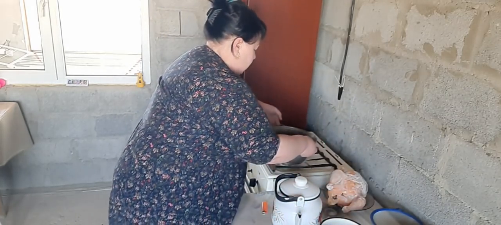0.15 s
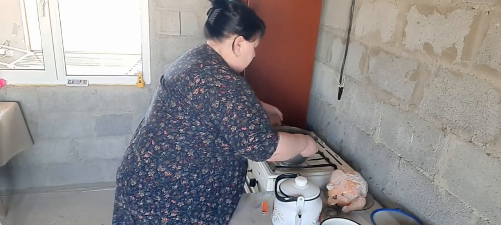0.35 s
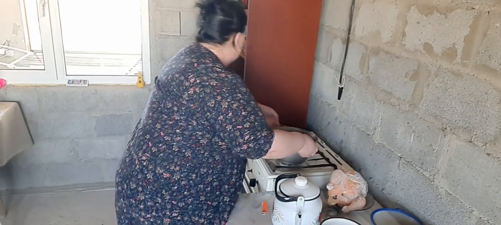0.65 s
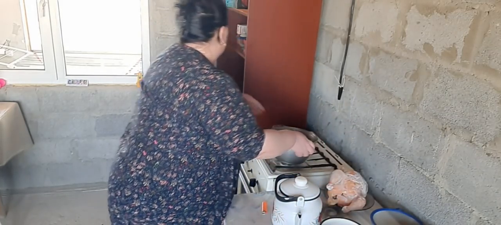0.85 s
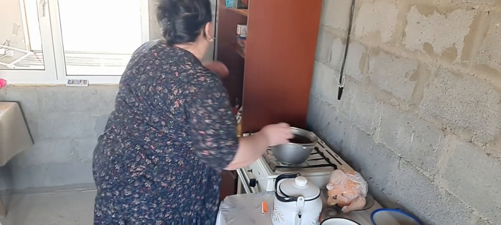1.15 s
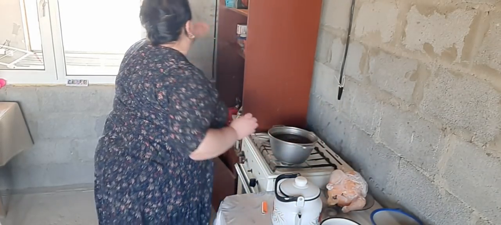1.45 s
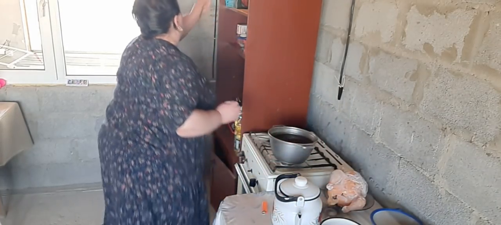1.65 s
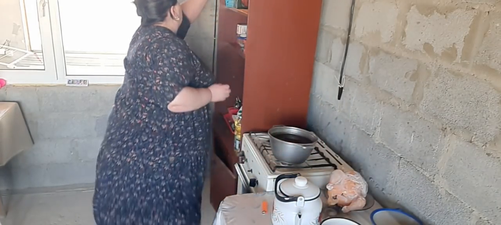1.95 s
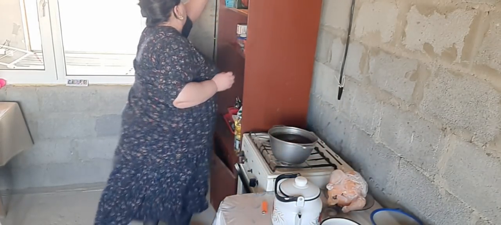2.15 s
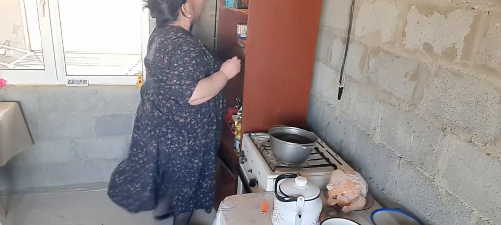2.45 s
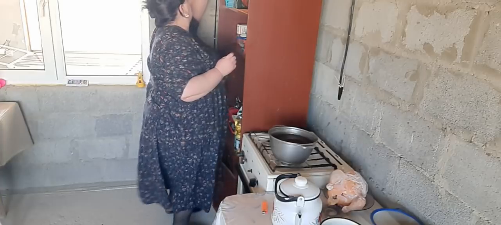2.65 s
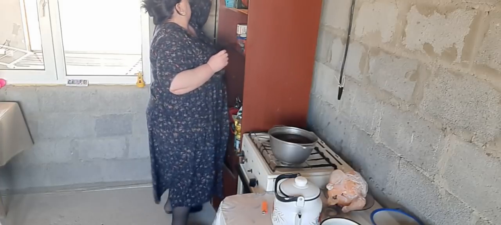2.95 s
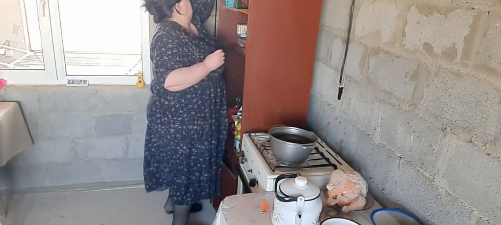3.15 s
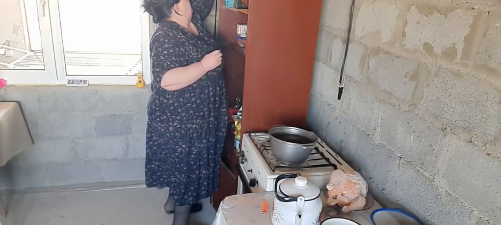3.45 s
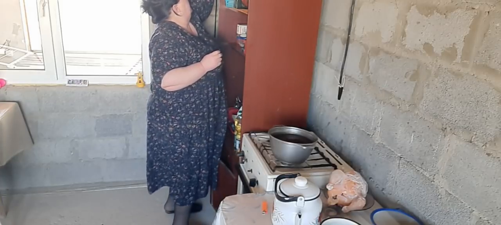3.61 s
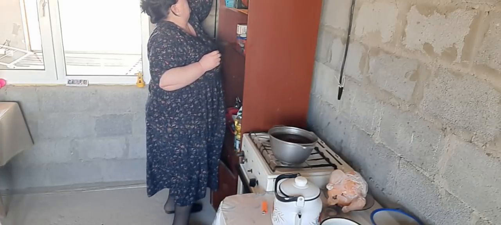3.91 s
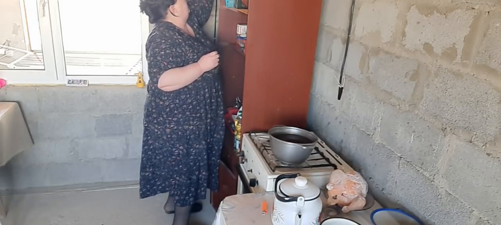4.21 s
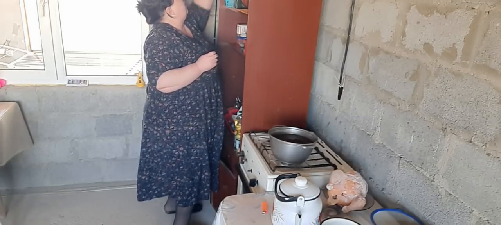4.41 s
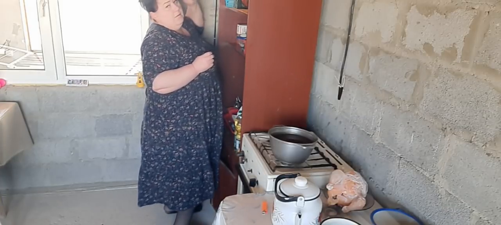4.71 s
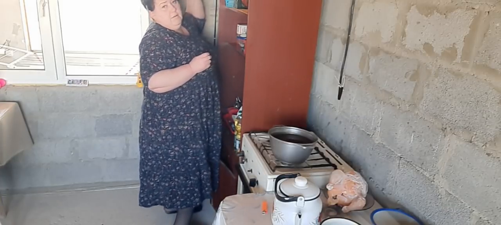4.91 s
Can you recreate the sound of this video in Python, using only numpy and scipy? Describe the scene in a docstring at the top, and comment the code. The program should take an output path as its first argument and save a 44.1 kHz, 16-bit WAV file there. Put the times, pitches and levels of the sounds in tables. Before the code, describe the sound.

In a bare kitchen, a pot rasps on a gas stove, soft steps follow, a dish knocks on a shelf and thin metal clatters down.

```python
"""A metal pot is shoved across a gas stove's grate: jerky slips rasp, ring the wall and make the sheet body drone.
Slippers thud and brush to a cupboard; a dish drags over a shelf, its rim singing, and knocks its neighbours.
A metal utensil clatters down and the wood is bumped: each blow is a noise crack, ringing modes and a room wash.
Under it all, the bare block-walled kitchen has faint air noise and a very thin, high electrical whine, a sine.
"""
import sys
import numpy as np
from scipy import signal
from scipy.fft import rfft, irfft, next_fast_len
from scipy.io import wavfile
from scipy.ndimage import uniform_filter1d

SR = 44100
rng = np.random.default_rng(int(sys.argv[2]) if len(sys.argv) > 2 else 0)


def generate_wav(sig):
    """Save sig (samples, or channels by samples) to the path in sys.argv[1] as 16-bit PCM at SR."""
    pcm = np.round(np.clip(np.atleast_2d(sig).T, -1, 1) * 32767).astype(np.int16)
    wavfile.write(sys.argv[1], SR, pcm)


N = 223603
TIME = np.arange(N) / SR
AGE = TIME[:SR * 3 // 4]   # time since a blow

# Shoves of the pot across the grate: [start t/s, hold/s, stove drone level/dB, rasp level/dB]
POT_SHOVES = [(0.098, 0.04, -32, -35), (0.194, 0.019, -38.5, -57), (0.268, .005, -36.5, -72),
              (0.321, 0.068, -40.5, -53), (0.462, 0.013, -41, -46.5), (0.551, 0.025, -47.5, -57.5)]
# Pot catching on the bars: [t/s, level/dB, brightness/dB per octave]
POT_CATCHES = [(0.109, -51.5, 0.5), (0.131, -44, 9.5), (0.143, -34, 14), (0.499, -41, 3),
               (0.510, -49.5, -8.5), (0.580, -46.5, -4)]
# Ringing of the pot wall: [f/Hz, level/dB, t60/s before the cap in ring()]
POT_WALL_MODES = [(2920, -9, .25), (3110, -12.5, 0.19), (4059, -2.5, 0.24), (4720, -4, 0.4),
                  (4780, 1, 0.24), (5200, -27, 0.27), (7500, 2, .18), (7200, 4.5, 0.091), (7400, -8, 0.24),
                  (8400, -6, 0.33), (10150, -16, .2), (12100, -11, 0.14)]
# Spectrum of rasp and catches: [f/Hz, level/dB per Hz]
POT_SPECTRUM = [(200, -24), (600, 4), (1000, 3.5), (1700, -3.5), (2600, 0), (3600, -7), (4700, -5.5),
                (6000, -11.5), (7300, -7), (9200, -22), (12500, -21.5), (15500, -35), (18000, -50)]
# Grate jolting in its seat: [t/s, level/dB, brightness/dB per octave]
GRATE_JOLTS = [(0.130, -37, 3), (0.293, -43.5, -3), (0.360, -45, -2.5), (0.395, -55, 1)]
# Ringing of the grate: [f/Hz, level/dB, t60/s before the cap in ring()]
GRATE_RINGING = [(596, 7, 0.41), (1325, 3, 0.45), (1420, 4, 0.52), (1520, -16, 0.18), (2320, -3.5, 0.32),
                 (2756, -4, 0.18)]
# Spectrum of the grate's cracks: [f/Hz, level/dB per Hz]
GRATE_SPECTRUM = [(150, -34), (600, -1), (1100, -34), (1500, 7), (1900, -1), (2400, 2.5), (4000, -12.5),
                  (9000, -37), (16000, -58)]
SHOVE_ATTACK_S, DRONE_T60_S = 0.048, 0.24
RASP_T60_S, RASP_SAG_DB_PER_S = 0.44, 155   # the rasp is strongest as the pot breaks loose


def pot():
    """Its base rasps over the bars, ringing the wall; it catches now and then and jolts the grate."""
    start_s, hold_s, drone_db, rasp_db = np.transpose(POT_SHOVES)
    drone_level = strokes(zip(start_s, hold_s, drone_db), SHOVE_ATTACK_S, DRONE_T60_S)
    rasp_level = strokes(zip(start_s, hold_s, rasp_db), SHOVE_ATTACK_S, RASP_T60_S, RASP_SAG_DB_PER_S)
    spectrum = uneven(POT_SPECTRUM, ripple_db=5.5)
    drone = stove_drone()
    # the shaking grate presses and releases the pot, so the rasp chatters in step with it
    chatter_db = np.clip(drone.mean(axis=0), -2, 2)
    friction = slips(per_s=2500, spread_db=0.5) * amp(chatter_db)
    wall_ring = ring(POT_WALL_MODES) * fade(.25)
    singing = rms_one(signal.fftconvolve(friction, wall_ring, axes=1)[:, :N])
    rasp = rasp_level * (coloured(spectrum, friction) + amp(-11) * singing)
    catches = blows(POT_CATCHES, spectrum, crack_t60=0.15, room_db=-5, contact_s=0.00016,
                    modes=POT_WALL_MODES, modes_db=-1.5)
    jolts = blows(GRATE_JOLTS, GRATE_SPECTRUM, crack_t60=0.098, room_db=-3.5, contact_s=0.00049,
                  modes=GRATE_RINGING, modes_db=-4.5)
    return rasp + catches + jolts + drone_level * drone


# Resonances of the stove's sheet body: [f/Hz, width/Hz, level/dB]
STOVE_PANELS = [(108.8, 4.3, 1.5), (123, 13, 1.5), (155, 28, -13), (210, 33, -3), (304, 18, -0.5),
                (395, 41, -18), (444, 7.2, -11.5), (581, 19, -10), (669, 8.8, -9), (860, 98, -14)]


def stove_drone():
    """The pot's jerks shake the grate and the sheet panels under it."""
    jerks = coloured([(100, 0.0048), (1000, 0.0066)], slips(per_s=1200, spread_db=2.5))
    panels = resonate(jerks, STOVE_PANELS)
    band = signal.butter(3, [72, 1100], "band", fs=SR, output="sos")
    return steady(signal.sosfilt(band, panels))


# Slippers landing, before the footfall offsets: [t/s, level/dB, brightness/dB per octave]
SLIPPER_STEPS = [(0.755, -42, -3), (2.116, -39, 0), (2.603, -56, -2.5), (2.772, -64.5, -10),
                 (3.139, -54.5, 0)]
# Light touch, landing and sole settling, added to each step: [t/s, level/dB, brightness/dB per octave]
FOOTFALL_PARTS = [(-.031, -20, 4), (0, -2.5, 1), (.035, -10, 2)]
# Spectrum of the thuds: [f/Hz, level/dB per Hz]
STEP_SPECTRUM = [(40, -46), (100, -3), (220, -13), (360, 5.5), (520, 0.5), (750, -3.5), (1100, -6.5),
                 (1500, -18.5), (2500, -29), (4000, -44), (8000, -78)]
# Soles and dress brushing: [start t/s, hold/s, level/dB, brightness/dB per octave]
BRUSHES = [(-.04, 0.019, -63.5, -1), (0.725, 0.024, -60.5, 3), (0.895, 0.09, -77.5, 1.5),
           (1.006, .02, -65.5, 0), (1.127, 0.08, -77, 5), (1.47, 0.046, -73.5, -2.5),
           (1.544, 0.16, -65, -0.5), (2.076, 0.0054, -58, 0.5), (2.267, 0.035, -57.5, -1),
           (2.563, 0.022, -60, 1.1), (2.694, 0.0055, -65, 7.5), (3.177, .05, -73, -3),
           (3.241, .05, -70, -1.5), (3.637, .025, -55, 4.5), (4.641, .12, -79.5, -2)]
# Spectrum of the brushing: [f/Hz, level/dB per Hz]
BRUSH_SPECTRUM = [(150, -46.5), (250, -18.5), (377, -6), (463, -18.5), (559, -6.5), (788, -11),
                  (1730, -4.5), (2060, -10.5), (2800, -12), (15000, -13)]
BRUSH_ATTACK_S, BRUSH_T60_S = 0.026, .53


def feet():
    """Soft soles thud on the concrete and brush over it."""
    contacts = [np.add(step, part) for step in SLIPPER_STEPS for part in FOOTFALL_PARTS]
    out = blows(contacts, STEP_SPECTRUM, crack_t60=0.19, room_db=-6.5, contact_s=0.00077)
    friction = slips(per_s=6800, spread_db=2.0)
    for start_s, hold_s, level_db, tilt_db in BRUSHES:
        level = strokes([(start_s, hold_s, level_db)], BRUSH_ATTACK_S, BRUSH_T60_S)
        out += level * coloured(BRUSH_SPECTRUM, friction, tilt_db)
    return pan(out, left_db=0.5)


# Pushes of the dish along the shelf: [start t/s, hold/s, rumble level/dB, rim singing level/dB]
DISH_PUSHES = [(3.278, .14, -45.5, -46), (3.46, .07, -41, -57), (3.617, .13, -46.5, -76.5),
               (3.793, .04, -54.5, -49.5)]
# Spectrum of the drag: [f/Hz, level/dB per Hz]
DRAG_SPECTRUM = [(50, -30.5), (95, -9.5), (260, -15.5), (400, -3.5), (560, 0.5), (760, -4.5), (1000, -11),
                 (1500, -18.5), (2300, -23.5), (3500, -16.5), (5500, -20.5), (8000, -26.5), (10000, -34.5),
                 (16000, -35)]
# Resonances of the rubbed rim: [f/Hz, width/Hz, level/dB]
DISH_RIM = [(1960, 74, 6.5), (2022, 50, 1), (3250, 60, -13), (3680, 40, -12)]
# Dishes touching: [t/s, level/dB, brightness/dB per octave, touches]
DISH_TOUCHES = [(3.298, -48.5, -6, 1), (3.327, -40, 2, 1), (3.394, -49.5, -2, 1), (3.450, -22.5, 1, 4),
                (3.70, -51.5, -4.5, 1), (3.761, -45, 6, 1)]
# Ringing of a dish: [f/Hz, level/dB, t60/s before the cap in ring()]
DISH_RINGING = [(242, -10, .3), (399.3, -7.5, 0.57), (504.4, -9.5, 0.42), (668, 0, 0.22), (911, 3, 1),
                (1965, -17.5, .5), (2753, -12.5, .3), (3020, -16, .27), (3194, 2.5, 0.13), (3400, -5, 0.17),
                (3980, 3, 0.11), (4040, -9, 0.36), (4830, -7.5, 0.27), (5407, -10, 0.39),
                (6458, -9.5, 0.27)]
# Spectrum of the dish cracks: [f/Hz, level/dB per Hz]
DISH_SPECTRUM = [(50, -44.5), (130, -16), (240, -3.5), (500, -1), (900, -4), (1150, -8.5), (1700, -20.5),
                 (2700, -9), (4100, -2.5), (6400, -17), (8500, -26.5), (10000, -39), (16000, -46.5)]
# Change from touch to touch: [gap/s, loss/dB, dulling/dB per octave]
DISH_REBOUND = (.0125, 3.5, .1)
PUSH_ATTACK_S, DRAG_T60_S = 0.031, 0.34
RIM_T60_S, RIM_SAG_DB_PER_S = .5, 53


def dishes():
    """A dish is dragged over the shelf in uneven jerks, its rim singing, and knocks against its neighbours."""
    start_s, hold_s, drag_db, rim_db = np.transpose(DISH_PUSHES)
    drag_level = strokes(zip(start_s, hold_s, drag_db), PUSH_ATTACK_S, DRAG_T60_S)
    rim_level = strokes(zip(start_s, hold_s, rim_db), PUSH_ATTACK_S, RIM_T60_S, RIM_SAG_DB_PER_S)
    friction = slips(per_s=1100, spread_db=-0.5)
    drag = drag_level * coloured(uneven(DRAG_SPECTRUM, ripple_db=10.5), friction)
    rim = rim_level * steady(resonate(friction, DISH_RIM))
    spectrum = uneven(DISH_SPECTRUM, ripple_db=6)
    knocks = blows(bouncing(DISH_TOUCHES, DISH_REBOUND), spectrum, crack_t60=.06, room_db=-10,
                   contact_s=.0005, modes=DISH_RINGING, modes_db=-2)
    return drag + rim + pan(knocks, left_db=-0.4)


# Utensil tipping, then landing on each end: [t/s, level/dB, brightness/dB per octave, touches]
UTENSIL_LANDINGS = [(3.821, -37, -0.5, 1), (3.8715, -12, 1.5, 6), (3.877, -14, 0, 2)]
# Ringing of the utensil: [f/Hz, level/dB, t60/s before the cap in ring()]
UTENSIL_RINGING = [(456, -7.5, .22), (648, -4.5, .22), (1325, -9, 0.32), (1393, -0.5, 0.23),
                   (1648, -1.5, 0.17), (1699, -4, 0.28), (1818, -6, 0.47), (2256, -11.5, .3),
                   (2430, -11, 0.37), (2466, 3.5, 0.27), (3027, -4, 0.076), (3506, -4, 0.23),
                   (3990, -8, 0.26), (4665, -5, 0.31), (4776, -6.5, 0.28), (5447, -5.5, .32),
                   (5380, -0.5, 0.29), (5566, -9.5, .25), (6360, -12.5, .3), (6030, -10, 0.37),
                   (6780, -12.5, .3), (7270, -6, 0.19), (8300, -14, .2), (8680, -6.5, 0.25),
                   (10440, -11, .23), (13814, -20.5, .2)]
# Spectrum of its cracks: [f/Hz, level/dB per Hz]
UTENSIL_SPECTRUM = [(60, -46.5), (200, -28), (450, -7), (850, -13), (1300, -2.5), (1750, 3), (2150, -6.5),
                    (3500, -3.5), (4400, -6.5), (5500, -3.5), (8300, -10.5), (10000, -19.5), (14000, -17.5),
                    (17000, -36.5)]
# Change from touch to touch: [gap/s, loss/dB, dulling/dB per octave]
UTENSIL_REBOUND = (.0312, 6.3, 1.3)


def utensil():
    """Thin metal lands on one end, then the other, and bounces."""
    spectrum = uneven(UTENSIL_SPECTRUM, ripple_db=6)
    return blows(bouncing(UTENSIL_LANDINGS, UTENSIL_REBOUND), spectrum, crack_t60=.07, room_db=-8.5,
                 contact_s=.0009, modes=UTENSIL_RINGING, modes_db=-5.5)


# Cupboard wood bumped: [t/s, level/dB, brightness/dB per octave, touches]
WOOD_BUMPS = [(3.625, -39.5, -1.5, 1), (3.710, -44.5, 1.5, 2), (3.902, -31, -2, 2), (5.008, -56, 3.5, 1),
              (5.0215, -31, -1, 1), (5.039, -30.5, -0.5, 2)]
# Ringing of the panel: [f/Hz, level/dB, t60/s before the cap in ring()]
WOOD_RINGING = [(130, -12.5, 0.34), (277, -2.5, .3), (643, -8, 0.26), (807, 2.5, 0.11), (1415, -5.5, 0.16),
                (1730, -9, 0.2)]
# Spectrum of the bumps' cracks: [f/Hz, level/dB per Hz]
WOOD_SPECTRUM = [(41, -57), (70, -26), (188, -16), (255, -8), (330, -8), (643, -6), (700, -25), (797, -3),
                 (1030, -18.5), (1770, -21.5), (12000, -56), (15600, -94.5), (22000, -120)]
# Change from touch to touch: [gap/s, loss/dB, dulling/dB per octave]
WOOD_REBOUND = (.018, 3, .1)


def cupboard():
    """Hollow knocks of a wooden panel: a crack plus a few low, short-lived modes."""
    return blows(bouncing(WOOD_BUMPS, WOOD_REBOUND), WOOD_SPECTRUM, crack_t60=.12, room_db=-9.0,
                 contact_s=0.00099, modes=WOOD_RINGING, modes_db=-9.0)


# Spectrum of the room's still air: [f/Hz, level/dB per Hz]
AIR_SPECTRUM = [(20, -22.5), (45, -4), (65, 4.5), (110, -1), (200, -7), (400, -8), (600, -14), (950, -8.5),
                (2000, -15.5), (4000, -23.5), (8000, -17.5), (10000, -27), (14200, -22.5), (15000, -15),
                (16500, -19.5)]
AIR_DB, WHINE_DB = -75, -67   # levels before panning
WHINE_HZ = 15625


def room_tone():
    """Faint air and a slightly wavering electrical whine from the right."""
    drift = np.interp(TIME, np.linspace(0, TIME[-1], num=24), rng.standard_normal(size=24))
    waver_db = 1.5 * rms_one(drift)
    whine = amp(WHINE_DB + waver_db) * np.sin(2 * np.pi * WHINE_HZ * TIME)
    air = amp(AIR_DB) * noise(AIR_SPECTRUM, N)
    return pan(air, left_db=3.5) + pan(whine, left_db=-18)


ROOM_T60_S, WALL_CUT_HZ = 0.33, 19000


def blows(events, colour, crack_t60, room_db, contact_s, modes=None, modes_db=0):
    """Each blow: a crack of dense short modes, the body's clear modes, and the duller wash from the walls."""
    out = np.zeros((2, N))
    walls = signal.butter(1, WALL_CUT_HZ, fs=SR)
    swell = (1 - np.exp(-AGE / contact_s)) ** 2   # the contact builds up smoothly
    for s, level_db, tilt_db in events:
        crack = noise(colour, len(AGE), tilt_db) * fade(crack_t60)
        wash = signal.lfilter(*walls, noise(colour, len(AGE), tilt_db))
        wash = wash * fade(ROOM_T60_S) * (1 - fade(0.031))   # the wash swells in behind the crack
        clear = amp(modes_db) * ring(modes, tilt_db) if modes else 0
        add(out, s, amp(level_db) * swell * (crack + amp(room_db) * wash + clear))
    return out


def bouncing(events, bounce):
    """A knock repeats at even gaps, weaker and duller each time."""
    gap_s, loss_db, dull_db = bounce
    return [(s + k * gap_s, level_db - k * loss_db, tilt_db - k * dull_db)
            for s, level_db, tilt_db, touches in events
            for k in range(round(touches))]


def strokes(rows, attack_s, t60, sag_db_per_s=0):
    """Level of a series of rubs: each swells, holds or sags while the motion lasts, then dies away."""
    power = 0
    for s, hold_s, level_db in rows:
        age = TIME - s - attack_s
        sag_db = sag_db_per_s * np.clip(age, 0, hold_s)
        decay_db = 60 * np.maximum(age - hold_s, 0) / t60
        swell = np.clip(1 + age / attack_s, 0, 1) ** 2
        power = power + (swell * amp(level_db - sag_db - decay_db)) ** 2
    return np.sqrt(power)


def slips(per_s, spread_db):
    """Stick-slip: tiny jerks at random moments, of uneven size and either sign."""
    sizes = amp(spread_db * np.minimum(rng.exponential(1, (2, N)), 4))
    signs = rng.choice([-1, 1], (2, N))
    return sizes * signs * (rng.random((2, N)) < per_s / SR)


def resonate(drive, resonances):
    """Pass a drive through parallel resonances of given width and level."""
    return sum(amp(level_db) * rms_one(signal.lfilter(*signal.iirpeak(hz, hz / width_hz, fs=SR), drive))
               for hz, width_hz, level_db in resonances)


def steady(x):
    """The hand's even push keeps a rubbed body's swing near rms 1."""
    return x / np.sqrt(uniform_filter1d(np.mean(x ** 2, axis=0), size=1200) + 1e-12)


def uneven(colour, ripple_db):
    """A body's countless weak modes cut narrow peaks and dips into its spectrum."""
    hz = np.arange(40, SR / 2, 65)
    depth_db = ripple_db * hz / (hz + 700)   # shallower in the bass
    ripple = np.clip(rng.standard_normal(len(hz)), -2, 1)
    return np.column_stack([hz, at_hz(colour, hz) + depth_db * ripple])


# Stereo agreement of the two channels: [f/Hz, left-right likeness/1]
STEREO_LIKENESS = [(100, 1), (250, 0.57), (500, .75), (1200, 0.078), (3000, 0.039), (7000, 0.088),
                   (15000, 0)]
LONGEST_RING_S = .38


def ring(modes, tilt_db=0):
    """Free ringing of a body, rms 1 at the start; high modes reach the two sides out of step."""
    hz, level_db, t60 = np.transpose(modes)
    t60 = np.clip(t60, .01, LONGEST_RING_S)   # the hand and the supports damp every mode
    gain = amp(level_db + tilt_db * np.log2(hz))
    apart = np.arccos(np.clip(at_hz(STEREO_LIKENESS, hz), -1, 1)) * rng.choice([-1, 1], len(hz))
    phase = rng.uniform(0, 2 * np.pi, len(hz)) + np.outer([.5, -.5], apart)
    waves = np.sin(2 * np.pi * np.outer(hz, AGE) + phase[..., None])
    waves = waves * np.exp(-np.log(1000) * AGE / t60[:, None])
    return gain @ waves / np.sqrt(np.sum(gain ** 2) / 2)


def coloured(colour, drive, tilt_db=0):
    """Give two unrelated drives a spectrum; the channels agree in the bass and part in the treble."""
    size = drive.shape[1]
    padded = next_fast_len(size)
    hz = np.maximum(np.fft.rfftfreq(padded, 1 / SR), 1)
    alike = np.clip(at_hz(STEREO_LIKENESS, hz), -1, 1)
    mid, side = rfft(drive, padded)
    both = np.sqrt(1 + alike) * mid + np.sqrt(1 - alike) * side * [[1], [-1]]
    gain = amp(at_hz(colour, hz) + tilt_db * np.log2(hz))
    return rms_one(irfft(both * gain, padded)[:, :size])


def noise(colour, size, tilt_db=0):
    """Stereo noise of a given spectrum."""
    return coloured(colour, rng.standard_normal((2, size)), tilt_db)


def fade(t60):
    """Exponential decay after a blow."""
    return np.exp(-np.log(1000) * AGE / t60)


def amp(db):
    """Decibels to gain."""
    return 10 ** (np.asarray(db) / 20)


def rms_one(x):
    """Scale to unit rms."""
    return x / np.sqrt(np.mean(x ** 2) + 1e-20)


def at_hz(points, hz):
    """Read a table on a log-frequency axis."""
    f, value = np.transpose(points)
    return np.interp(np.log(hz), np.log(f), value)


def add(out, s, sound):
    """Mix a sound in from time s."""
    start = min(round(s * SR), N)
    out[:, start:start + sound.shape[1]] += sound[:, :N - start]


def pan(x, left_db):
    """Lean a sound to the left (to the right if negative)."""
    return x * amp([[left_db / 2], [-left_db / 2]])


# Leftward lean of the handling sounds: [f/Hz, left minus right level/dB]
HANDLING_LEAN = [(100, 0), (400, 2), (1000, 3), (3000, 3), (6500, 0), (11000, 2.5)]


def scene():
    """Everything in the kitchen; the handling sounds lean left by an amount that varies with frequency."""
    handling = pot() + feet() + dishes() + utensil() + cupboard()
    padded = next_fast_len(N + len(AGE))
    lean_db = at_hz(HANDLING_LEAN, np.maximum(np.fft.rfftfreq(padded, 1 / SR), 1))
    leaning = rfft(handling, padded) * amp(np.outer([.5, -.5], lean_db))
    return irfft(leaning, padded)[:, :N] + room_tone()


CUTOFF_HZ = 16000


def record(dry):
    """The microphone drops the deepest bass; the top is cut steeply."""
    thin = signal.sosfilt(signal.butter(1, 35, "high", fs=SR, output="sos"), dry)
    return signal.sosfilt(signal.ellip(12, .1, 90, CUTOFF_HZ, fs=SR, output="sos"), thin)


dry = scene()
out = record(dry)
generate_wav(out)
```